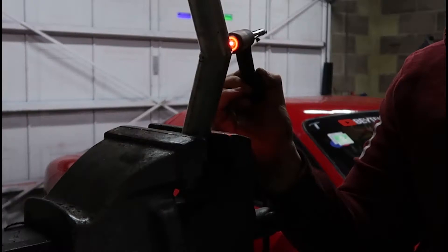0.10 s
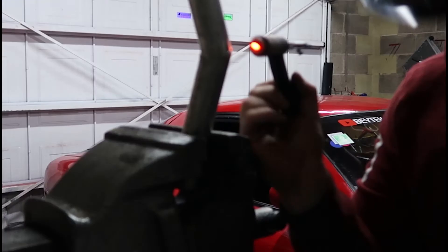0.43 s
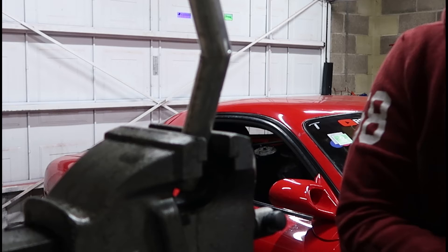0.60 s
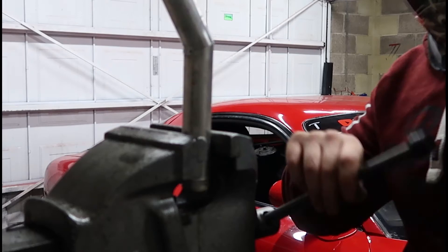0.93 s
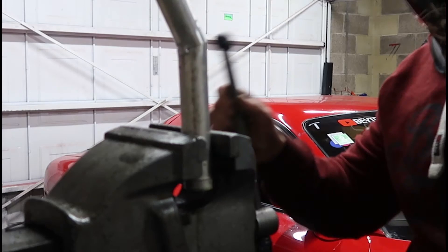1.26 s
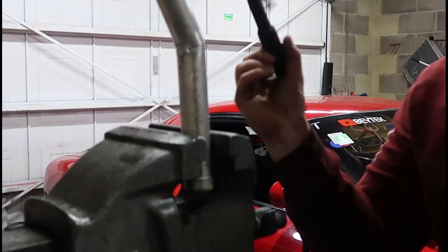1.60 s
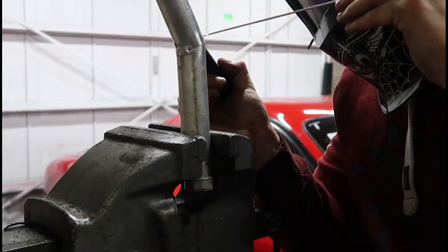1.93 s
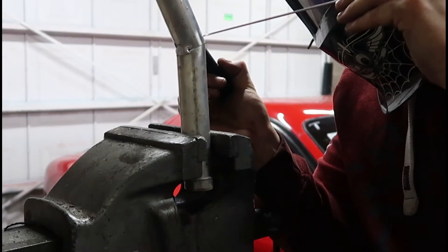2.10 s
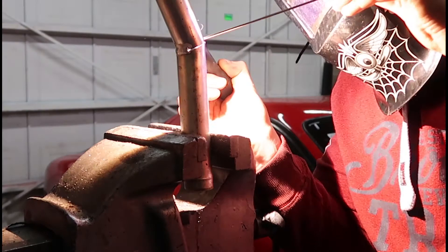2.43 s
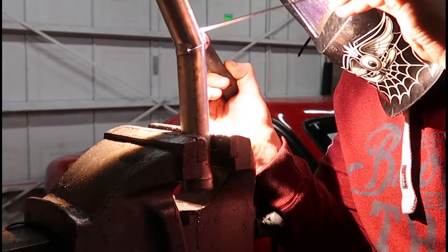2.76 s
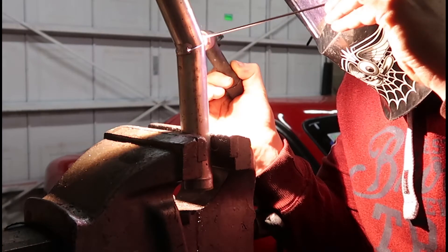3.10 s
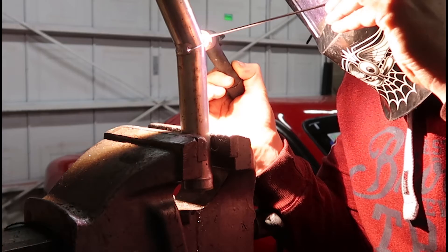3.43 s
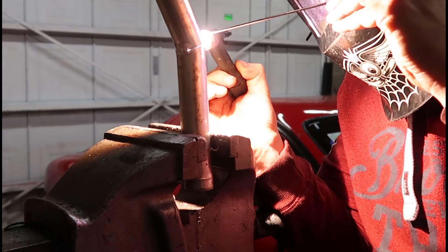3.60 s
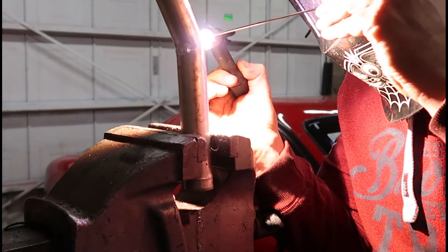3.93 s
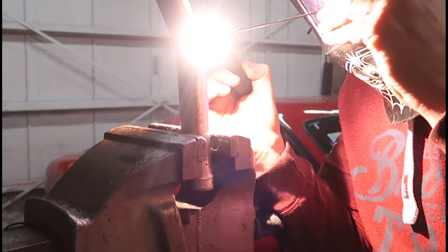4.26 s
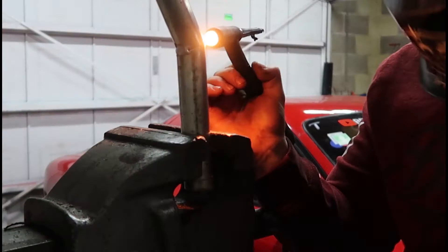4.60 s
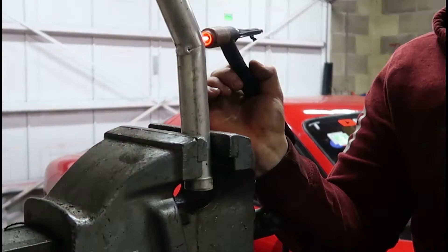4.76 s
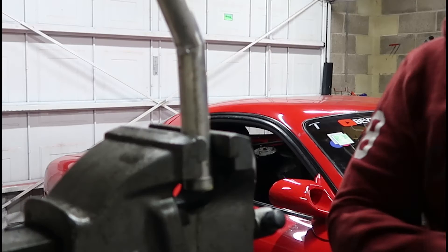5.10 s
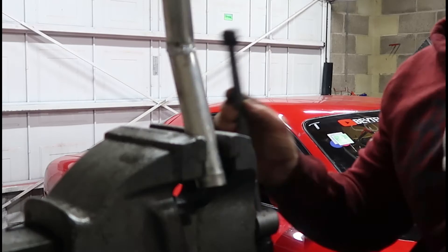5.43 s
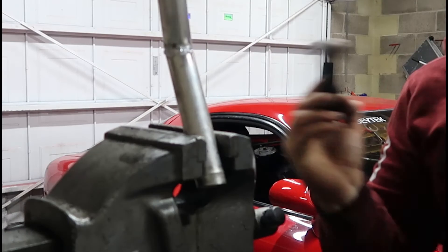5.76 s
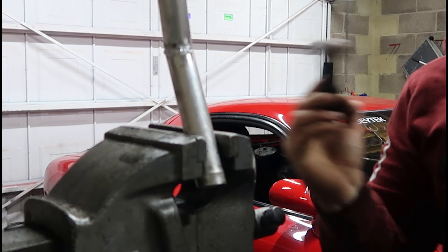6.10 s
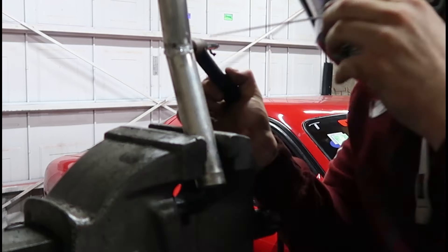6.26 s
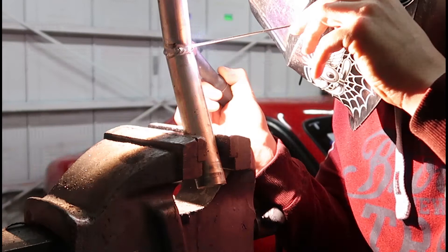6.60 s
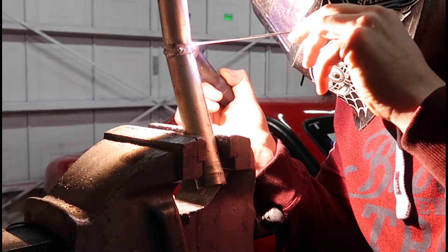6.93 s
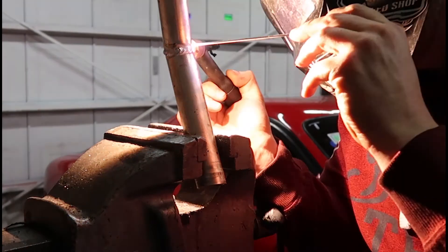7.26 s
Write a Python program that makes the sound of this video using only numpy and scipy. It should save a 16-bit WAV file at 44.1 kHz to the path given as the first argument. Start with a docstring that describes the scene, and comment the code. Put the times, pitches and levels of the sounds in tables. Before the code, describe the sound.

A welding arc buzzes and sizzles on a metal pipe in two bursts, with light knocks and a faint steady fan whine between.

```python
"""AC TIG welding arc on a pipe in a vice, close by in a garage, nearly mono.
Twice a spark lights the arc; it sputters, then buzzes and sizzles with a crack at each current reversal.
Before and between the welds, torch, rod and pipe knock, with one light slide along the metal.
The welder's fan whines throughout; its pitch sags under load.
Whine, air and hiss duck while the arc burns."""
import sys
import numpy as np
from scipy import signal
from scipy.fft import rfft, irfft
from scipy.io import wavfile

SR = 44100
rng = np.random.default_rng(int(sys.argv[2]) if len(sys.argv) > 2 else 0)


def to_wav(s):
    """Save 16-bit WAV."""
    ch = np.atleast_2d(s).T  # columns
    pcm = np.round(np.clip(ch, -1, 1) * 32767)  # PCM
    wavfile.write(sys.argv[1], SR, pcm.astype(np.int16))


N = 330309
T = np.arange(N) / SR

# One list per weld. Each row: time in seconds, current from 0 to 1, buzz level in dB.
WELDS = [
    [(2.08, 1, -42.5), (2.15, 1, -37.5), (2.33, .92, -41), (2.82, 0.93, -36), (2.99, 0.81, -40),
     (3.48, 0.73, -39), (3.68, 0.82, -40.5), (4.0, .85, -37), (4.388, .88, -39.5)],
    [(6.318, 0.49, -39), (6.45, 0.87, -35), (6.95, 0.99, -35.5), (7.02, 0.3, -36), (7.11, 0.3, -39.5),
     (7.25, 0.37, -36.5), (7.34, 0.83, -34.5), (7.49, 0.93, -36.5)],
]
# Buzz spectrum of each weld. Each row: harmonic number, relative level in dB.
FIRST_HARMONICS = [(1, -40), (2, -34), (3, -28), (4, -31), (5, -13.5), (6, -42.5), (7, -16), (8, -13.5),
                   (9, -7), (10, -24.5), (11, -11), (12, -15.5), (13, -8), (14, -7.5), (15, -4), (16, -12),
                   (17, -4.5), (18, -5), (19, -2), (20, -6), (21, -8), (22, -1), (23, -10), (24, 2.9),
                   (25, -9.5), (26, -0.5), (27, -2), (28, -7), (29, -10.5), (30, -2), (31, -14)]
SECOND_HARMONICS = [(1, -41.5), (2, -30.5), (3, -30.5), (4, -29.5), (5, -14.5), (6, -41), (7, -19),
                    (8, -17), (9, -7.5), (10, -25), (11, -7.5), (12, -17), (13, -16.5), (14, -11.5),
                    (15, -4), (16, -4.5), (17, -4.5), (18, -5), (19, -10), (20, -9), (21, -14), (22, -15.5),
                    (23, -6.5), (24, 1.8), (25, 1.5), (26, 0.5), (27, 0.5), (28, -9), (29, -5.5), (30, 0.5),
                    (31, -5)]
# Torch hold per weld. Each row: sizzle offset in dB, detour of the hand echo in m, its creep in m/s.
TORCH_HOLDS = [(-13.5, 0.075, -0.0035), (-19.5, .495, 0.023)]
# Unsteady arc. Each row: start in seconds, end in seconds, crackle level in dB, spit level in dB.
SPUTTERS = [(1.998, 2.024, -45, -58), (2.024, 2.081, -40.5, -36.7), (2.081, 2.18, -52, -56),
            (4.38, 4.399, -47, -54), (4.399, 4.411, -38.5, -50), (6.273, 6.293, -42, -56),
            (6.293, 6.324, -38.5, -40.5), (6.324, 6.356, -43, -49)]
# Arc cracks; spitting of the melting surface. Each row: frequency in Hz, relative gain in dB.
CRACK_SPECTRUM = [(100, -60), (400, -35), (1000, -20), (2800, -17), (4200, -11), (5600, -16), (7200, -7),
                  (11000, -1), (13200, 0), (14500, -4), (15500, -8)]
SPIT_SPECTRUM = [(80, -57), (250, -35), (550, -9.5), (800, -26), (1200, -7), (1800, 2.5), (3200, -0.5),
                 (4300, 3.5), (5300, -5.5), (12000, -12.5)]
# Sparks; handling knocks. Each row: time in seconds, peak in dB, centre in Hz, width in octaves.
SPARKS = [(1.9968, -16, 11000, 1.3), (2.0200, -21, 12000, .9), (2.0303, -21, 9000, 1.2),
          (2.0345, -20, 8000, 1.4), (4.3865, -26, 3500, .9), (4.4100, -23, 12000, .7),
          (6.2675, -16, 12500, 1.0), (6.3015, -21, 9000, 1.3)]
KNOCKS = [(.2649, -33.5, 7100, 0.93), (.3776, -31, 8950, 0.54), (.8047, -16.5, 8650, 1.9),
          (.8316, -37, 2570, 0.35), (.834, -63, 348, 0.12), (.9244, -23, 9800, 0.56),
          (.9873, -27.5, 1250, 0.73), (.9975, -43, 1090, 0.46), (1.0855, -18, 9400, 0.99),
          (1.112, -38, 1190, 1.3), (1.207, -38, 900, 0.98), (1.358, -39, 1900, 0.23),
          (1.365, -28.5, 8900, .81), (1.3704, -33, 2130, 0.33), (1.4018, -37, 2180, 0.25),
          (1.69, -53, 340, 0.48), (4.5896, -37.5, 1994, 0.19), (4.601, -36, 2184, 0.45),
          (4.6183, -27, 4580, .7), (4.650, -32, 4985, 1.0), (5.274, -14.5, 8500, 1.58),
          (5.299, -36.5, 2600, 0.26), (5.3947, -23, 11540, 0.54), (5.4815, -35.5, 1396, 1.16),
          (5.484, -52, 345, 0.28), (5.920, -28, 5000, 2.4), (5.9605, -35, 5500, 0.49)]
# Slide along the metal. Each row: time in seconds, level in dB.
SLIDE_LEVELS = [(4.84, -70), (4.89, -50), (4.93, -53.5), (4.98, -53.5), (5.03, -80)]
# Its friction noise. Each row: frequency in Hz, relative gain in dB.
SLIDE_SPECTRUM = [(4000, -34), (7800, -16.5), (8600, 7.5), (9500, -3.5), (12000, -1.5), (15500, -20)]
# Fan whine before ducking. Each row: time in seconds, level in dB.
FAN_LEVELS = [(0, -56.5), (.52, -57), (.65, -50.5), (1.3, -51), (1.55, -45.5), (2.0, -46.5), (4.35, -47.5),
              (4.57, -58), (4.62, -47), (4.85, -51.5), (5.25, -51), (5.8, -45), (7.49, -47)]
# Fan overtones. Each row: multiple of the blade rate, relative level in dB.
FAN_OVERTONES = [(2, -2.5), (3, -1.5), (4, -9), (5, -24.5), (6, -6), (7, -8)]
# Cooling air; broad hiss; stereo side signal. Each row: frequency in Hz, relative gain in dB.
RUSH_SPECTRUM = [(30, -39.5), (150, -35), (240, -30.5), (330, -23), (480, -13.5), (555, -3), (650, -12),
                 (800, 2.5), (940, 2), (1150, -4.5), (1500, -8.5), (2500, -12), (5000, -29.5)]
HISS_SPECTRUM = [(120, -52.5), (300, -37), (500, -25), (900, 0.5), (2200, 2), (2450, 0), (2750, 7.5),
                 (3200, 5), (4200, -1), (6500, -0.5), (9000, -2), (13000, -6), (15500, -9)]
SIDE_SPECTRUM = [(60, -38), (400, -49), (1500, -31), (2600, -20), (4400, -17.5), (8000, 15), (14000, 17.5)]

CYCLE_HZ, RETURN_DELAY_CYCLES = 499.27, .506  # AC rate; lag from main crack to return crack
RETURN_SHARE, RETURN_RISE = 0.14, .65  # return/main crack at full current; extra at zero current
WEAK_ARC_DB, HEATING_DB_PER_S = 7.5, 2.23  # extra sizzle at zero current, and as the pool heats
BLADE_HZ, BLADE_SAG_HZ = 1046.3, 22.06  # idle rate; drop at full current
WHINE_DUCK_DB, RUSH_DUCK_DB, HISS_OVERTONE_DUCK_DB = 24, 25.5, 14.5  # at full burn


def arc(flutter_db=1.0, sag_hz=6.5, settle_s=.07):
    """Buzz and sizzle on one beat. At low current the two cracks even out and the sizzle grows."""
    steady, uneven = np.zeros(N), np.zeros(N)
    for weld, harmonics, hold in zip(WELDS, (FIRST_HARMONICS, SECOND_HARMONICS), TORCH_HOLDS):
        offset_db, detour_m, creep_m_per_s = hold
        t = T[(T >= weld[0][0]) & (T <= weld[-1][0])]
        age_s = t - t[0]
        current, buzz_db = curves(weld, t)
        return_share = np.clip(RETURN_SHARE + RETURN_RISE * (1 - current), 0, 1)
        sizzle_gain_db = offset_db + WEAK_ARC_DB * (1 - current) + HEATING_DB_PER_S * age_s
        hz = CYCLE_HZ - sag_hz * np.exp(-age_s / settle_s)  # flat while the arc settles
        cycles = np.cumsum(hz) / SR
        tone = buzz(t, cycles, harmonics, return_share, detour_m + creep_m_per_s * age_s)
        add(steady, t[0], tone * undb(buzz_db + flutter_db * drift(t, 29.91)))
        add(uneven, t[0], sizzle(t, cycles) * undb(buzz_db + sizzle_gain_db))
    return steady + garage(uneven, near_db=1.0, far_db=2)


def buzz(t, cycles, harmonics, return_share, detour_m,
         hand_gain=.26, bench_gain=.16, sway_gain=.13, sway_hz=2.5, smear_rad=.35):
    """Two cracks a cycle make a comb of partials; hand and bench echoes recolour it as the torch moves."""
    out = 0
    for k, db in harmonics:
        return_crack = return_share * np.exp(-2j * np.pi * k * RETURN_DELAY_CYCLES)
        hand = hand_gain * np.exp(-2j * np.pi * k * CYCLE_HZ * detour_m / 343)
        bench = bench_gain * np.exp(2j * np.pi * rng.random())
        bench += sway_gain * (drift(t, sway_hz) + 1j * drift(t, sway_hz))
        partial = np.exp(2j * np.pi * k * cycles + 1j * smear_rad * rng.standard_normal())
        out += level(np.real((1 + return_crack + hand + bench) * partial), db)
    return level(out, 0)


def sizzle(t, cycles, flicker_db=4.5, flicker_hz=50):
    """The arc relights with a different strength at each reversal."""
    reversals = np.diff(np.floor(2 * cycles), prepend=0)
    cracks = reversals * rng.uniform(-0.86, 1, len(t))
    flicker = undb(flicker_db * np.tanh(drift(t, flicker_hz)))
    return level(colour(cracks * flicker, CRACK_SPECTRUM), -3.1)


def sputter(pops_per_s=2600, scatter_db=3.5):
    """Lighting or dying, the arc jumps about the surface in dense, uneven pops."""
    out = np.zeros(N)
    for start_s, end_s, crackle_db, spit_db in SPUTTERS:
        n = int((end_s - start_s) * SR)
        pops = (rng.random(n) < pops_per_s / SR) * undb(scatter_db * rng.standard_normal(n))
        pops *= rng.choice([-1, 1], n)
        pops = np.pad(pops, (0, SR // 200))  # room to ring out
        crackle = level(colour(pops, CRACK_SPECTRUM), crackle_db)
        spit = level(colour(pops, SPIT_SPECTRUM), spit_db)
        add(out, start_s, crackle + spit)
    return garage(out, near_db=-5, far_db=-17)


def sparks():
    """Single sparks snap as the arc lights or dies."""
    return garage(clicks(SPARKS, decay_cycles=2.5), near_db=-8, far_db=-18)


def handling():
    """Knocks of torch, rod and pipe; one light slide."""
    slide_db, = curves(SLIDE_LEVELS)
    slide = noise(SLIDE_SPECTRUM, 0) * undb(slide_db + 1.3 * drift(T, 90))
    knocks = clicks(KNOCKS, decay_cycles=7.3)
    return garage(knocks, near_db=-1.5, far_db=-7) + slide


def clicks(rows, decay_cycles, snap_gain=4.9):
    """Snaps, each dying away in one broad resonance; lower ones ring longer."""
    out, t = np.zeros(N), T[:SR // 10]
    hz = np.geomspace(40, 20000, 40)
    low_cut_db = -20 * np.log10(1 + (300 / hz) ** 4)
    for start_s, peak_db, centre_hz, width_oct in rows:
        resonance_db = -20 * np.log10(1 + (np.log2(hz / centre_hz) / width_oct) ** 2 / 2)
        tail = rng.standard_normal(len(t)) * np.exp(-t * centre_hz / decay_cycles)
        burst = colour(snap_gain * (t == 0) + tail, np.column_stack([hz, resonance_db + low_cut_db]))
        add(out, start_s, burst * undb(peak_db) / np.abs(burst).max())
    return out


def fan(burn, overtone_db=-64, waver_db=1.33, waver_hz=0.61, overtone_waver_db=2.0):
    """Blade-pass whine and overtones. Pitch sags under load; level ducks while the arc burns."""
    fan_db, = curves(FAN_LEVELS)
    hz = BLADE_HZ - BLADE_SAG_HZ * burn + waver_hz * drift(T, 25)
    phase = 2 * np.pi * np.cumsum(hz) / SR
    whine = level(np.sin(phase), 0) * undb(fan_db - WHINE_DUCK_DB * burn + waver_db * drift(T, 14))
    overtones = sum(level(np.sin(k * phase), db) * undb(overtone_waver_db * drift(T, 15))
                    for k, db in FAN_OVERTONES)
    return whine + overtones * undb(overtone_db - HISS_OVERTONE_DUCK_DB * burn)


def air(burn, rush_gain_db=-5.0, flicker_db=1.5, idle_hiss_db=-53.5):
    """Cooling air follows the fan level; it and a broad hiss duck while the arc burns."""
    fan_db, = curves(FAN_LEVELS)
    rush = noise(RUSH_SPECTRUM, rush_gain_db)
    rush *= undb(fan_db - RUSH_DUCK_DB * burn + flicker_db * drift(T, 14))
    hiss = noise(HISS_SPECTRUM, idle_hiss_db) * undb(-HISS_OVERTONE_DUCK_DB * burn)
    return rush + hiss


def burn_envelope(lead_s=0.0697, lag_s=.13):
    """Smoothed welding current, 0 to 1, starting just ahead of the buzz."""
    current = np.zeros(N)
    for weld in WELDS:
        lit = (T >= weld[0][0] - lead_s) & (T <= weld[-1][0])
        current += curves(weld)[0] * lit
    pole = np.exp(-1 / (lag_s * SR))
    return signal.lfilter([1 - pole], [1, -pole], current)


def garage(x, near_db, far_db, near_t60_s=0.0162, far_t60_s=0.15):
    """Direct sound, quick reflections off vice and bench, then the tail of the walls."""
    t = T[:SR // 2]
    near = rng.standard_normal(len(t)) * undb(-60 * t / near_t60_s) * (t > .0005)
    far = rng.standard_normal(len(t)) * undb(-60 * t / far_t60_s) * (t > .006)
    response = (level(near, near_db) + level(far, far_db)) / np.sqrt(len(t))
    return x + signal.fftconvolve(x, response)[:N]


def undb(db):
    """Decibels to gain."""
    return 10 ** (np.asarray(db) / 20)


def level(x, db):
    """Set the rms level."""
    return x * undb(db) / np.sqrt(np.mean(np.abs(x) ** 2))


def curves(rows, t=T):
    """Interpolate each column over the times in the first."""
    times_s, *columns = np.transpose(rows)
    return [np.interp(t, times_s, column) for column in columns]


def drift(t, rate_hz):
    """Smooth random drift, spread near 1."""
    points = rng.standard_normal(int((t[-1] - t[0]) * rate_hz) + 4)
    fine = signal.resample(points, 16 * len(points))
    return np.interp((t - t[0]) * rate_hz * 16, np.arange(len(fine)), fine)


def colour(x, spectrum, taps=2048):
    """Minimum-phase filter through (Hz, dB) points."""
    hz, db = np.transpose(spectrum)
    bins_hz = np.fft.rfftfreq(taps, 1 / SR)
    gain = undb(np.interp(np.log(bins_hz + 1), np.log(hz), db))
    cepstrum = irfft(np.log(gain))
    cepstrum[1:taps // 2] *= 2
    cepstrum[taps // 2 + 1:] = 0
    response = irfft(np.exp(rfft(cepstrum)))
    return signal.fftconvolve(x, response)[:len(x)]


def noise(spectrum, db):
    """Coloured noise at an rms level."""
    return level(colour(rng.standard_normal(N), spectrum), db)


def add(out, start_s, x):
    """Mix x into out."""
    start = int(start_s * SR)
    out[start:start + len(x)] += x[:N - start]


def scene():
    """All centred but for a faint side signal that follows the treble while the arc burns, over faint wide
    hiss."""
    welding = arc() + sputter() + sparks()
    spread = garage(welding, near_db=-57, far_db=-47.5) - welding
    side = noise(SIDE_SPECTRUM, -69.5) + colour(spread, SIDE_SPECTRUM)
    burn = burn_envelope()
    mid = welding + handling() + fan(burn) + air(burn)
    return np.array([mid + side, mid - side])


def record(dry):
    """Steep low-pass at 15650 Hz."""
    return signal.sosfilt(signal.ellip(12, .1, 80, 15650, fs=SR, output="sos"), dry)


dry = scene()
out = record(dry)
to_wav(out)
```